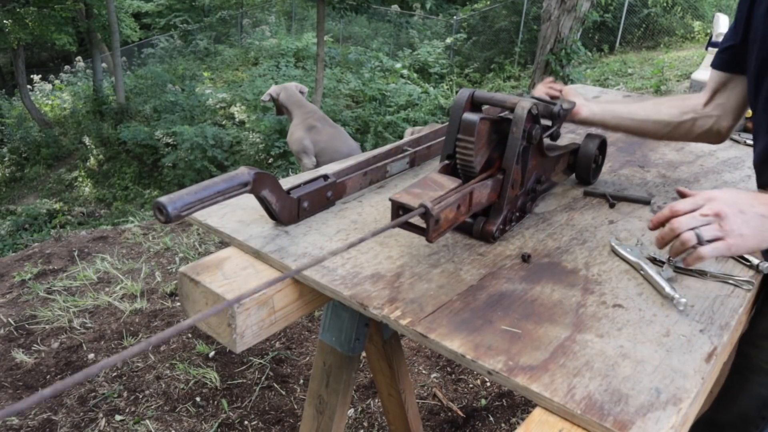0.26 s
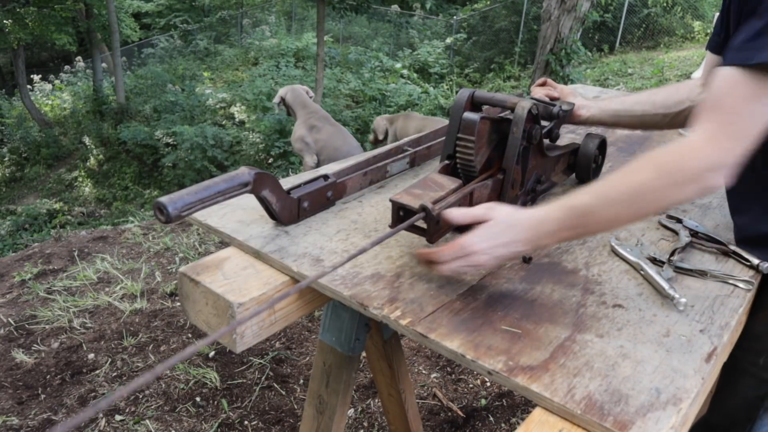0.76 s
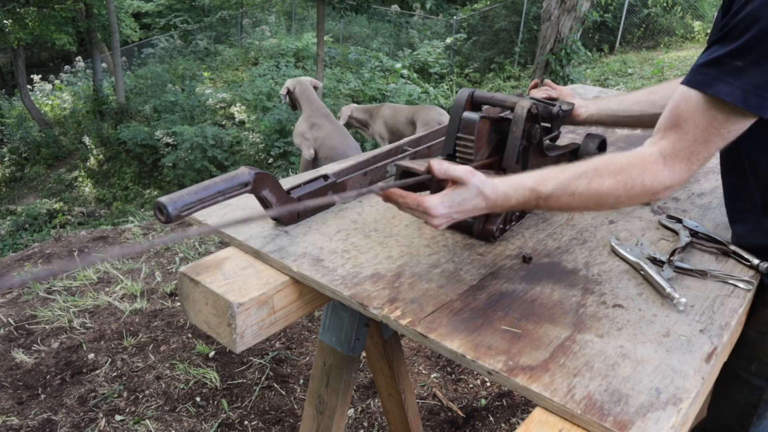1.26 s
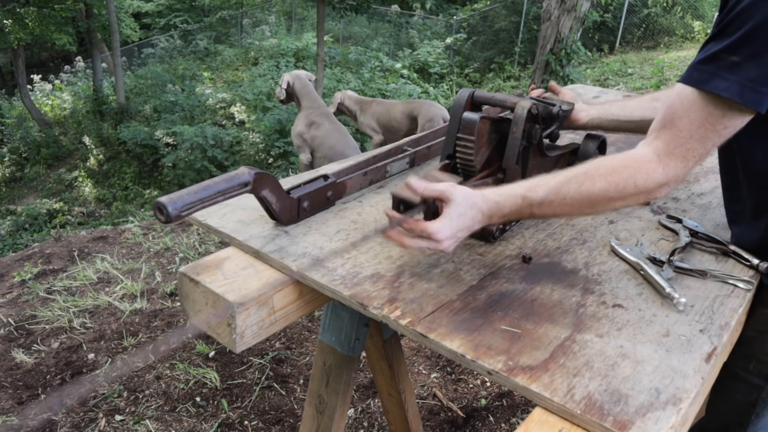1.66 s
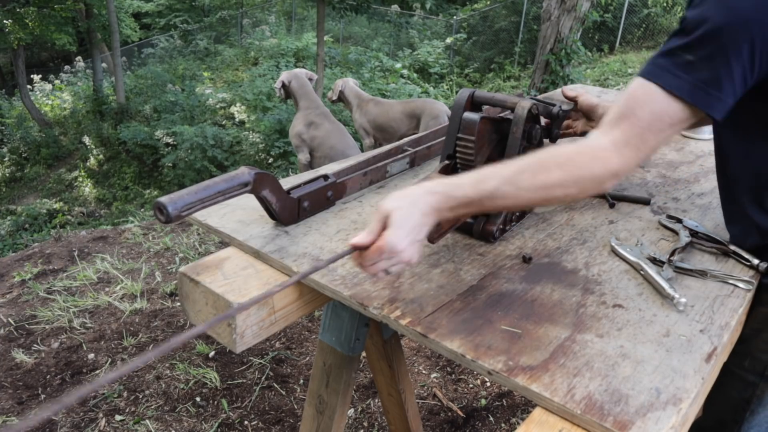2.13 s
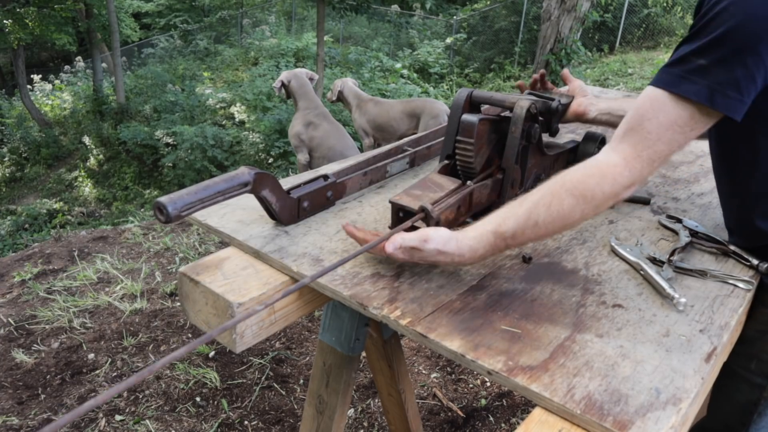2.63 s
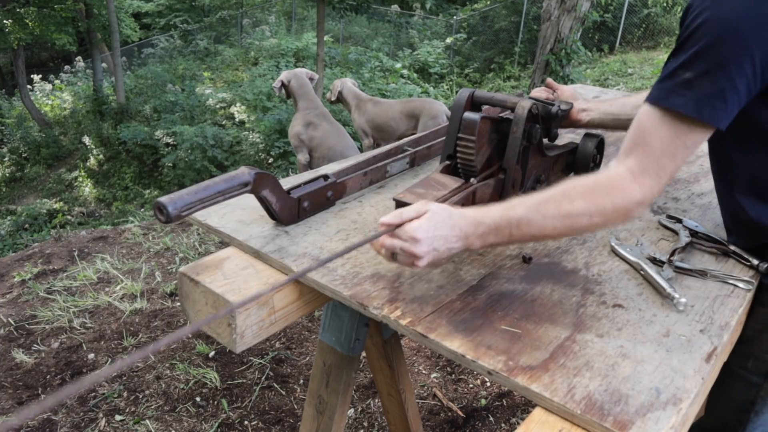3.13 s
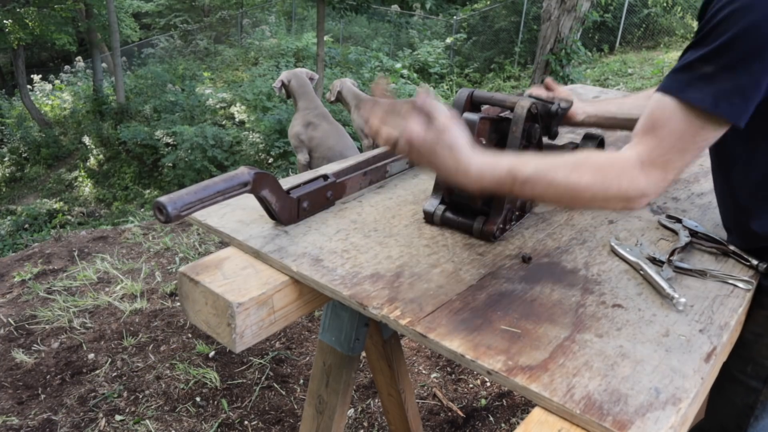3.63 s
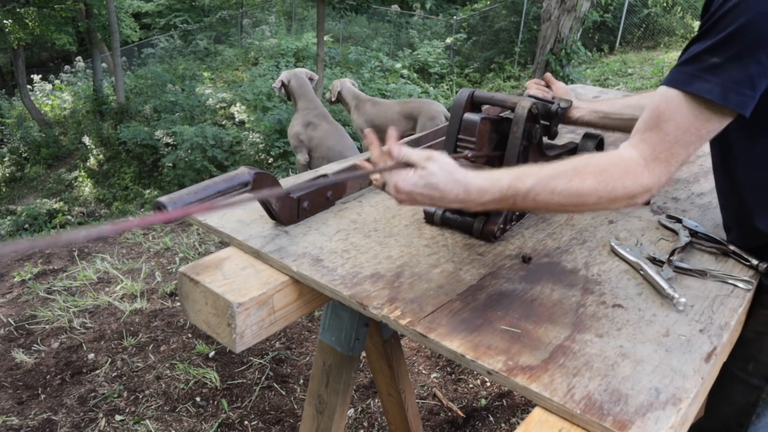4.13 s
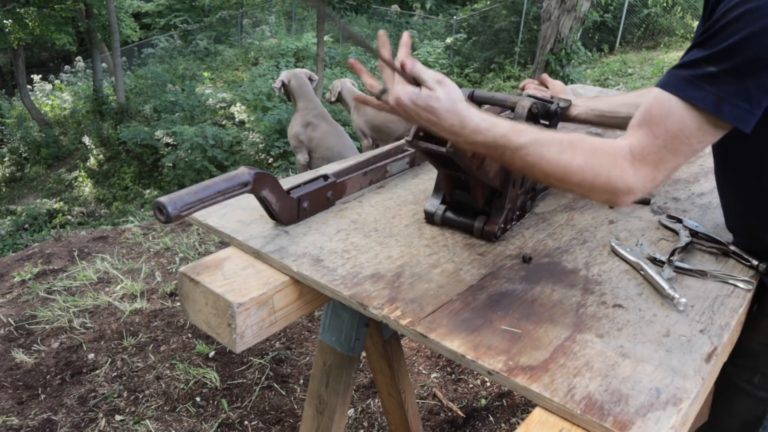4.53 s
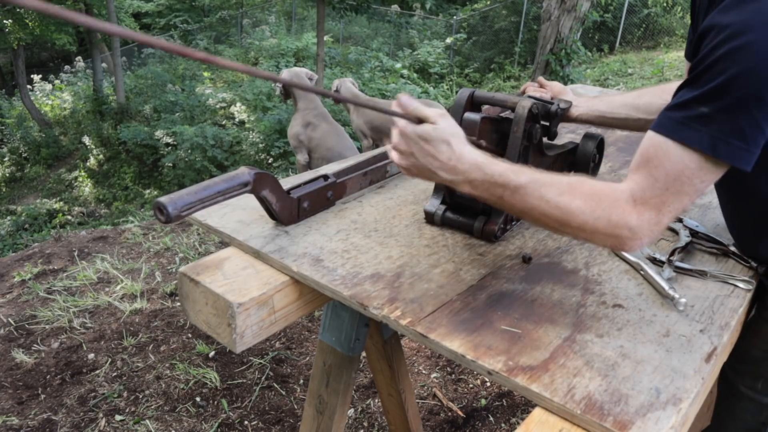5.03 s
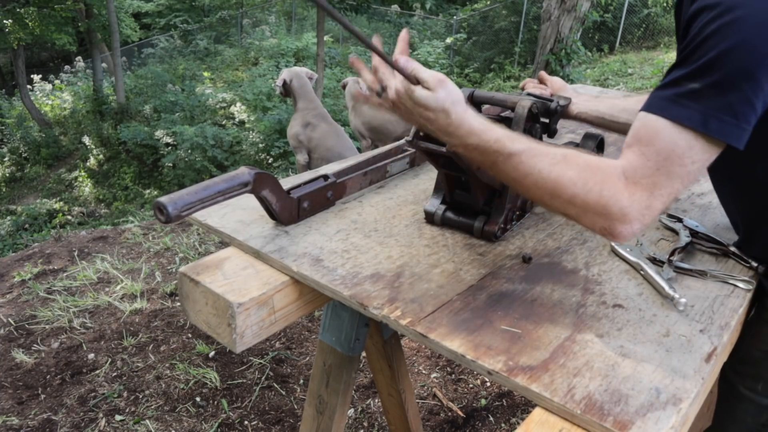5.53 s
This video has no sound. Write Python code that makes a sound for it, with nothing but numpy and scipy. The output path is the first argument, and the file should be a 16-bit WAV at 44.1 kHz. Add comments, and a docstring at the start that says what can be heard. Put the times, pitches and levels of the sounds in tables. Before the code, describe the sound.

Heavy clank of an old iron mechanism on wood, followed by sparse metallic clicks, scrapes and thumps in a quiet garden with faint insects.

```python
"""A rusty iron jack lies on a plywood bench outdoors and is worked by hand with a long steel rod.
The casting drops and rocks on the board: contact pulses, noise bursts and damped modes of iron and wood.
Its pawls click as small clusters of resonances, and the rod knocks, chatters and slides in its socket:
its bending modes are struck, or kept ringing by grains of noise.
Shaped noise makes the shuffling hands, the quiet garden and a nearly steady high band of insects."""
import sys
import numpy as np
from scipy import signal
from scipy.fft import rfft, irfft
from scipy.io import wavfile

SR = 44100
rng = np.random.default_rng(int(sys.argv[2]) if len(sys.argv) > 2 else 0)


def file_out(sig):
    """Save sig as 16-bit WAV at sys.argv[1]."""
    # one column per channel
    cols = np.atleast_2d(sig).T
    # limit, then scale
    lim = np.clip(cols, -1, 1)
    pcm = np.round(lim * 32767).astype(np.int16)
    wavfile.write(sys.argv[1], SR, pcm)


N = 255339
TIME = np.arange(N) / SR  # s, whole scene
AGE = np.arange(SR // 2) / SR  # s, one sound event
BAND_EDGE_HZ = 15900

# Table levels are relative: each layer adds its own trim.
# still air of the garden: (f/Hz, level/dB)
GARDEN_SPECTRUM = [(20, -21.5), (35, -15), (55, 4), (100, 6), (300, -14), (600, -19.5), (1100, -18),
                   (2000, -35), (4500, -34), (9000, -37.5), (12500, -34), (13100, -57), (16000, -56.5)]
# far insects: (f/Hz, level/dB)
INSECT_SPECTRUM = [(4300, -40), (5400, -14.5), (6100, -19), (6500, -4), (6950, -0.5), (7450, -6),
                   (7750, -15.5), (8200, -17), (9000, -39.5)]
# hands and iron shuffling on wood: (f/Hz, level/dB)
SHUFFLE_SPECTRUM = [(30, -22.5), (60, -2.5), (120, 3.5), (330, 1), (550, -5.5), (1100, -12), (2000, -19.5),
                    (4500, -29), (9000, -34.5), (14000, -59)]
# hands shove the jack about on the board: (middle t/s, length t/s, level/dB)
HAND_SHOVES = [(0.0, 0.19, -68.5), (0.143, .08, -68), (0.332, 0.25, -65), (0.674, 0.17, -69.5),
               (1.83, 0.24, -72), (3.372, 0.35, -75), (3.803, .13, -53.5), (4.021, 0.22, -62.5),
               (4.539, 0.19, -70.5), (4.787, 0.13, -63), (5.402, 0.47, -76.5)]
RESTING_HANDS_DB = -72.5

# plywood bench modes: (f/Hz, level/dB, t60/s before the ring factor)
BOARD_MODES = [(104, -18, .14), (138, -16, .1), (187, -2, .1), (211, -2, .1), (295, 0, .1), (324, 0, .09),
               (385, -8, .08), (455, -13, .05), (548, -7, .08), (578, -6, .09)]
# iron casting modes: (f/Hz, level/dB, t60/s before the ring factor)
CASTING_MODES = [(572, -2, .08), (622, -5, .06), (722, -3, .07), (835, 1, .09), (968, 0, .08),
                 (1071, 1, .09), (1212, -5, .07), (1358, -4, .07), (1690, -9, .06), (1790, -8, .06),
                 (1947, -8, .06), (2167, -9, .06), (2440, -8, .05)]
# bending modes of the rod, spreading apart with pitch: (f/Hz, level/dB)
ROD_MODES = [(2380, -2), (2680, -8.5), (3022, 0.5), (3345, -0.5), (3714, 1), (4093, -5), (4500, -6.5),
             (4880, -1.5), (5071, 4), (5313, 3), (5765, 4), (6228, -2.5), (6514, 0), (6720, -5.5),
             (7200, -1.5), (7705, -4), (8230, -2.5), (8772, -4.5), (9375, -5.5), (9942, -7), (10535, -7),
             (11112, -8), (11733, -10), (12378, -8), (13085, -17.5), (13725, -13), (14385, -20),
             (15062, -24), (15740, -22)]
# unpitched part of a blow on the board: (f/Hz, level/dB)
THUD_SPECTRUM = [(30, -50.5), (70, -19.5), (100, -9), (150, 2), (200, -7.5), (320, -2.5), (400, 0.5),
                 (460, -6.5), (570, 0), (900, -19.5), (2000, -55.5), (8000, -87)]
# unpitched part of a blow on the iron: (f/Hz, level/dB)
CLACK_SPECTRUM = [(200, -33.5), (470, -11.5), (600, 0.5), (830, 0), (1100, -1.5), (1450, 0), (1800, -8),
                  (2500, -9), (3300, -13.5), (6000, -36.5), (14000, -60.5)]
# timbre of a small steel part: (f/Hz, level/dB)
TICK_SPECTRUM = [(900, -28), (2000, -2.5), (2800, 0.5), (5200, -0.5), (7000, -11), (9000, -20),
                 (12000, -33.5), (16000, -47)]
# rust cracking at the contact: (f/Hz, level/dB)
CRACK_SPECTRUM = [(4000, -31), (7500, 0.5), (10000, -2.5), (13000, -7.5), (16000, -15.5)]
# loose parts trembling: (f/Hz, level/dB)
SETTLING_SPECTRUM = [(150, -21.5), (450, -5.5), (900, -0.5), (1500, -4), (2800, -11.5), (5000, -22),
                     (12000, -52.5)]

# the casting bumps on the bench: (t/s, iron clack level/dB, board thud level/dB, struck spot f/Hz)
CASTING_BUMPS = [(0.007, -40.5, -41, 338), (0.093, -32.5, -40.5, 453), (0.317, -6.5, -11.5, 385),
                 (0.321, -5, -14.5, 227), (0.34, -24, -29, 337), (0.363, -25.5, -29.5, 178),
                 (0.38, -11, -25.5, 610), (0.442, -34, -42, 183), (1.193, -46, -51, 145),
                 (1.735, -31, -44, 705), (1.786, -42, -47, 139), (1.799, -42, -49.5, 576),
                 (1.82, -40.5, -43, 137.5), (1.938, -39.5, -48, 570), (2.206, -35.5, -41.5, 342),
                 (2.293, -57, -48, 150.8), (2.653, -39.5, -42, 423.5), (2.83, -34.5, -23, 299),
                 (2.839, -30, -27, 183), (2.849, -28, -32, 902), (2.941, -44, -50.5, 191),
                 (3.253, -44.5, -48, 572), (3.572, -37.5, -40, 447), (3.659, -57, -43, 573),
                 (3.725, -42, -47.5, 378), (3.756, -43, -39, 368), (3.782, -36, -36.5, 335),
                 (3.83, -40, -39.5, 210), (3.866, -39.5, -65, 140), (3.917, -42, -47.5, 176),
                 (3.983, -50, -39.5, 300), (4.012, -43.5, -46, 296), (4.276, -56.5, -53, 126),
                 (4.451, -56, -48.5, 337), (4.595, -30, -38.5, 390), (4.614, -50, -44.5, 335),
                 (4.628, -57, -46.5, 285), (4.862, -30.5, -30.5, 307), (4.985, -45.5, -48.5, 590),
                 (5.361, -46.5, -45.5, 139), (5.402, -48, -42, 266), (5.504, -58.5, -53, 334),
                 (5.653, -49.5, -48.5, 394)]
# hard bumps press the parts together and ring shorter: (iron clack level/dB, factor on ring times)
BUMP_RING_FACTOR = [(-70, .9), (-34.5, .8), (-10, .6)]
# plywood gives under a heavy landing, which dulls the contact: (board thud level/dB, cut-off f/Hz)
BOARD_CUSHION = [(-42.5, 9000), (-28, 3500), (-12.5, 1900)]
# the slack of the mechanism lets the casting rock back once after each blow
ROCK_S, ROCK_DB = .013, -15.5
# a bump shakes a pawl; harder bumps add only a share of their dB
SHAKE_DB, SHAKE_SHARE, SHAKE_ROD_DB, SHAKE_HZ = -42, 0.49, -16, 1800

# a pawl or the rod's end clicks home: (t/s, pawl level/dB, rod ring level/dB, part f/Hz)
STEEL_CLICKS = [(0.09, -48, -67.5, 1830), (0.119, -67, -85, 4858), (0.32, -33.5, -51, 1810),
                (0.345, -39, -46.5, 3590), (0.442, -48, -49.5, 4890), (0.507, -47.5, -64.5, 3690),
                (0.606, -52.5, -55, 2667), (1.192, -53.5, -89.5, 1620), (1.25, -66, -84.5, 2400),
                (1.59, -43, -83, 2410), (1.818, -49, -60, 1697), (1.924, -48.5, -64, 2360),
                (2.021, -49, -64.5, 1635), (2.192, -47.5, -74, 4980), (2.206, -43.5, -46, 5160),
                (2.641, -48.5, -63.5, 1518), (3.217, -44, -63.5, 5160), (3.251, -56.5, -81, 3120),
                (3.434, -48, -67, 2390), (3.481, -65.5, -89, 2250), (3.557, -55, -73, 2250),
                (3.646, -41, -55, 2416), (3.696, -33.5, -57, 5070), (3.77, -39.5, -53, 5450),
                (3.803, -34.5, -39, 5540), (3.827, -39.5, -51.5, 4580), (3.902, -45, -59.5, 3700),
                (3.944, -42.5, -47.5, 2380), (3.948, -41.5, -68, 6500), (3.997, -48.5, -66, 3560),
                (4.096, -46, -55.5, 3060), (4.126, -58.5, -74.5, 3380), (4.759, -33.5, -46, 4990),
                (4.861, -30, -47, 2540), (4.869, -38.5, -61, 5200), (5.407, -53, -66.5, 6600)]
# hard clicks crush the rust at once: (pawl level/dB, factor on ring times, time to bite t60/s)
CLICK_RING_AND_BITE = [(-49, 0.75, 0.027), (-48.5, 0.63, 0.024), (-35, 0.67, .007)]
# a click jolts the casting too, the more the lower its part is pitched; reference 4 kHz
JOLT_DB_PER_OCTAVE, JOLT_BOARD_DB, JOLT_SPOT_HZ = -8.5, -15, 616

# the rod slides or chatters in its socket: (t/s, length t/s, level/dB, treble tilt dB per octave)
ROD_RUBS = [(0.346, 0.013, -53, 4), (0.444, 0.024, -48.5, -0.5), (0.609, 0.034, -50.5, 1),
            (1.772, 0.035, -65.5, 4), (1.922, 0.017, -43.5, -1.5), (2.109, .15, -53, -3),
            (2.189, 0.021, -45, 2.5), (2.633, 0.034, -74.5, 14), (3.58, 0.16, -61.5, -2),
            (3.758, 0.026, -50, 1), (3.9, 0.037, -51.5, -3.5), (3.951, 0.032, -53.5, -1),
            (4.105, 0.1316, -62.5, 0.5), (4.462, 0.17, -71.5, 1.5), (4.744, 0.049, -51, 2),
            (4.788, 0.07, -50.5, -4), (5.111, .13, -60, 0.5), (5.655, 0.15, -72, -6.5)]
# rust on rust: (f/Hz, level/dB)
GRIT_SPECTRUM = [(150, -8.5), (350, 3.5), (700, 2), (1500, 4.5), (3000, 0), (5500, -0.5), (8000, -13),
                 (12000, -18.5), (16000, -32.5)]
# longer strokes start and stop more gently
RUB_RISE_SHARE, RUB_FALL_S, RUB_FALL_SHARE = .36, .027, 0.36

# when the weight lands, the trestles boom and loose parts hum on: (t/s, f/Hz, level/dB, t60/s)
WEIGHT_LANDINGS = [(2.831, 108.6, -28.5, 0.13), (2.6, 184, -54, 0.078), (2.845, 910, -44.5, 0.27),
                   (3.764, 136, -22, 0.06), (5.402, 105, -48, 0.13)]
# decay of the outdoor tail: (f/Hz, t60/s)
YARD_DECAY = [(100, 0.93), (300, 0.74), (1000, 0.44), (2500, 0.46), (6000, .35), (15000, 0.5)]


def amp(db):
    """Decibels to gain."""
    return 10 ** (np.asarray(db) / 20)


def unit(x):
    """Scales to rms 1."""
    return x / np.sqrt(np.mean(x ** 2) + 1e-20)


def unit_attack(x, size=600):
    """Scales a blow so that its first samples have rms 1."""
    return x / np.sqrt(np.mean(x[:size] ** 2) + 1e-20)


def read(points, hz):
    """Reads a table on a log-frequency axis."""
    f, value = np.transpose(points)
    return np.interp(np.log(hz + 1), np.log(f), value)


def colour(x, points):
    """Filters by a spectrum in dB."""
    gain = amp(read(points, np.fft.rfftfreq(len(x), 1 / SR)))
    return irfft(rfft(x) * gain, len(x))


def noise(points, size):
    """Coloured noise of rms 1."""
    return unit(colour(rng.standard_normal(size), points))


def drift(cutoff_hz):
    """Smooth random wander of rms 1: noise under a Gaussian low-pass."""
    lowpass = np.exp(-(np.fft.rfftfreq(N, 1 / SR) / cutoff_hz) ** 2)
    return unit(irfft(rfft(rng.standard_normal(N)) * lowpass, N))


def dying(t60):
    """Exponential decay by 60 dB in t60 seconds."""
    return np.exp(-np.log(1000) * AGE / t60)


def add(mix, s, sound):
    """Mixes a sound in at time s, or at the start if s is negative."""
    part = mix[max(round(s * SR), 0):][:len(sound)]
    part += sound[:len(part)]


def ring(hz, db, t60, signs, scatter_db, size=11000):
    """Damped modes; each blow lands elsewhere and weights them anew."""
    t = AGE[:size].astype(np.float32)
    weight = signs * amp(db + scatter_db * rng.standard_normal(len(hz)))
    sines = np.sin(np.outer(np.float32(2 * np.pi * hz), t))
    decays = np.exp(-np.outer(np.float32(np.log(1000) / t60), t))
    return np.pad(np.float32(weight) @ (sines * decays), (0, len(AGE) - size))


def outdoors(garden_db=-70, insects_db=-75.0, flutter_db=0.65):
    """Still air and a chorus of far insects, both shaped noise."""
    air = amp(garden_db) * noise(GARDEN_SPECTRUM, N)
    insect_gain = amp(insects_db + flutter_db * drift(60))
    return air + insect_gain * noise(INSECT_SPECTRUM, N)


def handling(lumpy_db=3):
    """A soft uneven shuffle of hands and iron on the wood, swelling with each shove."""
    swells = sum(amp(db) * np.exp(-(2 * (TIME - s) / length) ** 2) for s, length, db in HAND_SHOVES)
    unevenness = amp(lumpy_db * drift(25))
    return noise(SHUFFLE_SPECTRUM, N) * (amp(RESTING_HANDS_DB) + swells) * unevenness


def pawl(hz, ring_factor, t60=0.081, own_db=-7, dense_db=-1, dense_t60=.042,
         focus_db=7, focus_octaves=0.64, count=22):
    """A small steel part: one leading resonance, a scatter of others and a gritty noise edge."""
    grid = np.geomspace(900, 16000, 40)
    focus = focus_db * np.exp(-(np.log2(grid / hz) / focus_octaves) ** 2)  # lift around the lead
    timbre = np.c_[grid, read(TICK_SPECTRUM, grid) + focus]
    others = rng.uniform(1800, 7000, count)
    other_t60 = t60 * ring_factor * rng.uniform(0.2, 1.2, count)
    signs = rng.choice([-1, 1], count)
    modes = ring(others, read(timbre, others), other_t60, signs, scatter_db=4.5, size=6000)
    leading = np.sin(2 * np.pi * hz * AGE) * dying(t60 * ring_factor)
    grit = noise(timbre, len(AGE)) * dying(dense_t60 * ring_factor)
    return unit_attack(modes) + amp(own_db) * unit_attack(leading) + amp(dense_db) * unit_attack(grit)


def clinks(clink_db=-6, scatter_db=2, spread=.25, low_hz=1200, high_hz=3500, ring_factor=0.9, count=4):
    """Small loose parts clink faintly at random around each shove."""
    out = np.zeros(N)
    for s, length, db in HAND_SHOVES:
        for when, size in rng.standard_normal((count, 2)):
            clink = unit_attack(pawl(rng.uniform(low_hz, high_hz), ring_factor))
            add(out, s + spread * length * when, amp(db + clink_db + scatter_db * size) * clink)
    return out


def push(points, size=2048):
    """The contact itself: one causal, minimum-phase pulse of the given colour."""
    log_gain = np.log(amp(read(points, abs(np.fft.fftfreq(size, 1 / SR)))))
    spectrum = np.exp(np.conj(signal.hilbert(log_gain)))
    return np.pad(np.fft.ifft(spectrum).real, (0, len(AGE) - size))


def body(modes, points, spot_hz, ring_factor, push_db, burst_t60, burst_db, spot_db, spot_octaves=.22):
    """A contact pulse, a decaying noise burst for dense modes and a few long modes."""
    hz, db, t60 = np.transpose(modes)
    # the struck spot favours its nearest modes
    db = db + spot_db * np.exp(-(np.log2(hz / spot_hz) / spot_octaves) ** 2)
    pulse = push(points)
    burst = rng.standard_normal(len(AGE)) * dying(burst_t60 * ring_factor)
    dense = signal.fftconvolve(burst, pulse)[:len(AGE)]
    long = ring(hz, db, t60 * ring_factor, (-1) ** np.arange(len(hz)), scatter_db=3.5)
    return unit_attack(long) + amp(burst_db) * unit_attack(dense) + amp(push_db) * unit_attack(pulse)


def heavy_blow(iron_db, board_db, spot_hz, ring_factor):
    """The casting and the board under it, struck together."""
    board = body(BOARD_MODES, THUD_SPECTRUM, spot_hz, ring_factor,
                 push_db=-4.0, burst_t60=0.085, burst_db=-0.5, spot_db=15)
    iron = body(CASTING_MODES, CLACK_SPECTRUM, spot_hz, ring_factor,
                push_db=-4.5, burst_t60=.05, burst_db=5.5, spot_db=5.5)
    return amp(board_db - 6.5) * unit_attack(board) + amp(iron_db - 16.5) * unit_attack(iron)


def rocking(iron_db, board_db, spot_hz, ring_factor, lag_s=.0008):
    """The heavy parts follow the first touch, then rock back more softly on the giving plywood."""
    out = np.zeros(len(AGE))
    add(out, lag_s, heavy_blow(iron_db, board_db, spot_hz, ring_factor))
    add(out, lag_s + ROCK_S, heavy_blow(iron_db + ROCK_DB, board_db + ROCK_DB, spot_hz, ring_factor))
    cut_hz = np.interp(board_db, *np.transpose(BOARD_CUSHION))
    return signal.sosfilt(signal.butter(2, cut_hz, fs=SR, output="sos"), out)


def rod(ring_factor, tilt_db, t60=0.076, damping=.35):
    """The rod's bending modes, damped by the hand, higher modes sooner."""
    hz, db = np.transpose(ROD_MODES)
    ratio = hz / np.median(hz)
    mode_t60 = t60 * ring_factor / ratio ** damping
    signs = rng.choice([-1, 1], len(hz))
    return ring(hz, db + tilt_db * np.log2(ratio), mode_t60, signs, scatter_db=5.0)


def rod_blow(db, ring_factor, crack_db=-7, crack_t60=0.011, free_db=-42, span_db=45):
    """A crack of rust with the rod's ring; the hand deadens light touches sooner."""
    free = np.clip(1.5 + (db - free_db) / span_db, .3, 1.2)
    crack = noise(CRACK_SPECTRUM, len(AGE)) * dying(crack_t60)
    steel = rod(ring_factor * free, tilt_db=3.0)
    return unit_attack(steel) + amp(crack_db) * unit_attack(crack)


def light_blow(pawl_db, rod_db, hz, ring_factor, bite_s=0.0057):
    """A pawl and the rod; rust crushes before steel meets steel, so the blow starts softly."""
    bite = 1 - dying(bite_s)
    small_part = unit_attack(bite * pawl(hz, ring_factor))
    steel_rod = unit_attack(bite * rod_blow(rod_db, ring_factor))
    return amp(pawl_db - 5) * small_part + amp(rod_db + 1.5) * steel_rod


def bumps(settle_db=-37, settle_t60=.4):
    """The casting comes down on the board, shakes a pawl and leaves loose parts trembling."""
    out = np.zeros(N)
    for s, iron_db, board_db, spot_hz in CASTING_BUMPS:
        ring_factor = np.interp(iron_db, *np.transpose(BUMP_RING_FACTOR))
        shake_db = SHAKE_DB + SHAKE_SHARE * iron_db
        trembling = noise(SETTLING_SPECTRUM, len(AGE)) * dying(settle_t60)
        add(out, s, rocking(iron_db, board_db, spot_hz, ring_factor))
        add(out, s, light_blow(shake_db, shake_db + SHAKE_ROD_DB, SHAKE_HZ, ring_factor))
        add(out, s, amp(iron_db + settle_db) * trembling)
    return out


def clicks():
    """Steel snaps against steel and jolts the casting."""
    out = np.zeros(N)
    levels, ring_factors, bites = np.transpose(CLICK_RING_AND_BITE)
    for s, pawl_db, rod_db, hz in STEEL_CLICKS:
        ring_factor = np.interp(pawl_db, levels, ring_factors)
        bite_s = np.interp(pawl_db, levels, bites)
        jolt_db = pawl_db + JOLT_DB_PER_OCTAVE * np.log2(hz / 4000)
        add(out, s, light_blow(pawl_db, rod_db, hz, ring_factor, bite_s))
        add(out, s, rocking(jolt_db, jolt_db + JOLT_BOARD_DB, JOLT_SPOT_HZ, ring_factor))
    return out


def rubs(grit_db=-4, rod_db=-4.5, slips_per_s=700, uneven_db=0.5):
    """Rust catches and lets go in tiny slips that rasp and keep the rod ringing."""
    out = np.zeros(N)
    pressure = amp(uneven_db * drift(70))
    for s, length, db, tilt_db in ROD_RUBS:
        rise = RUB_RISE_SHARE * length
        fall = RUB_FALL_S + RUB_FALL_SHARE * length  # s per 30 dB
        stroke = np.minimum(AGE / rise, 1) * amp(-30 * np.maximum(AGE - length, 0) / fall)
        stroke = stroke * np.interp(s + AGE, TIME, pressure)
        slipping = rng.random(len(AGE)) < slips_per_s / SR
        slips = rng.standard_normal(len(AGE)) * (.15 + slipping)  # sparse grains over a weak hiss
        grit = [(f, level + tilt_db * np.log2(f / 4000)) for f, level in GRIT_SPECTRUM]
        rasp = unit(colour(slips, grit))
        steel = rod(0.39, tilt_db)
        sing = signal.fftconvolve(unit(slips) * stroke, steel / np.linalg.norm(steel))
        add(out, s, amp(db + grit_db) * rasp * stroke)
        add(out, s, amp(db + rod_db) * sing)
    return out


def landings():
    """Slow swings of the trestles and the hum of loose parts: softly starting, decaying sines."""
    out = np.zeros(N)
    for s, hz, db, t60 in WEIGHT_LANDINGS:
        onset = (1 - dying(4 / hz)) ** 2
        add(out, s, amp(db) * np.sin(2 * np.pi * hz * AGE) * dying(t60) * onset)
    return out


def yard(x, wet_db=-24, build_s=0.052):
    """Trees and ground scatter a faint tail back: noise decaying at its own pace in each band."""
    hz, t, z = signal.stft(rng.standard_normal(SR), SR, nperseg=256)
    decay = np.exp(-np.log(1000) * t / read(YARD_DECAY, hz)[:, None])
    tail = signal.istft(z * decay, SR, nperseg=256)[1][:len(AGE)]
    tail = tail * (1 - dying(build_s))
    return amp(wet_db) * signal.fftconvolve(x, tail / np.linalg.norm(tail))[:N]


def scene():
    """The jack close by, its faint tail, the hands and the garden."""
    jack = clinks() + bumps() + clicks() + rubs() + landings()
    return (outdoors() + handling() + jack + yard(jack))[None]


def record(dry):
    """The microphone sheds deep bass; then the band limit."""
    thinned = signal.sosfilt(signal.butter(2, 55, "highpass", fs=SR, output="sos"), dry)
    band_limit = signal.firwin(511, BAND_EDGE_HZ, window=("kaiser", 9), fs=SR)
    return signal.oaconvolve(thinned, band_limit[None], "same")


dry = scene()
out = record(dry)
file_out(out)
```